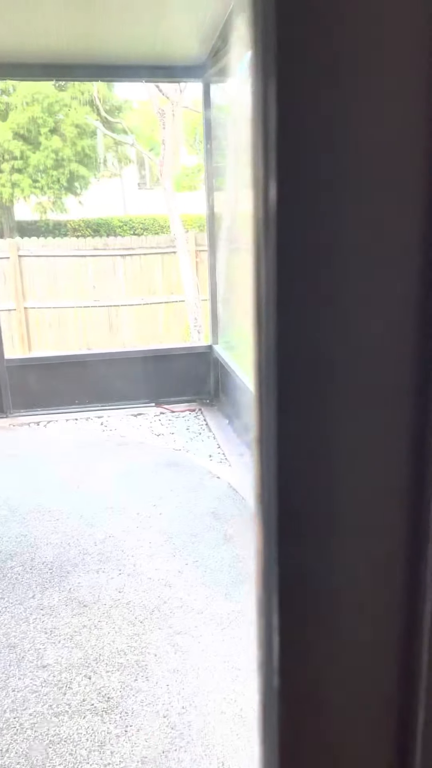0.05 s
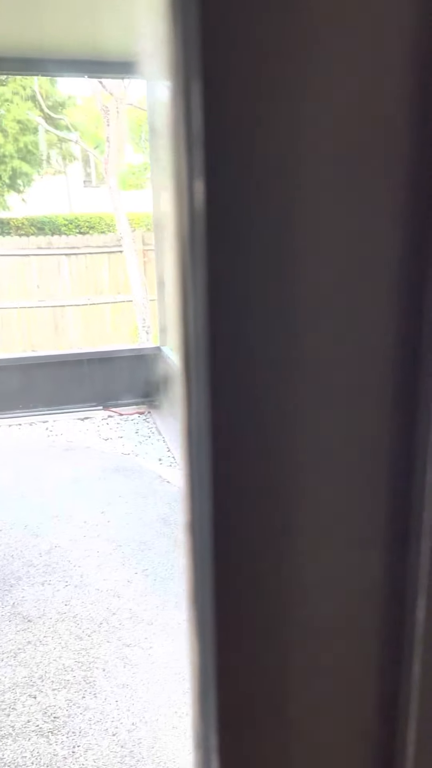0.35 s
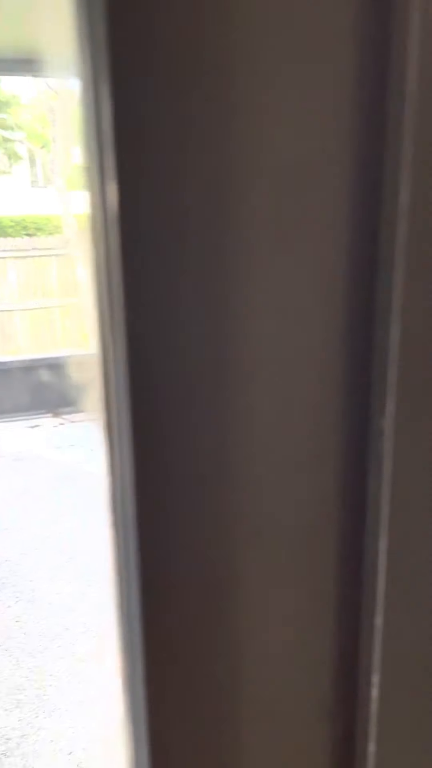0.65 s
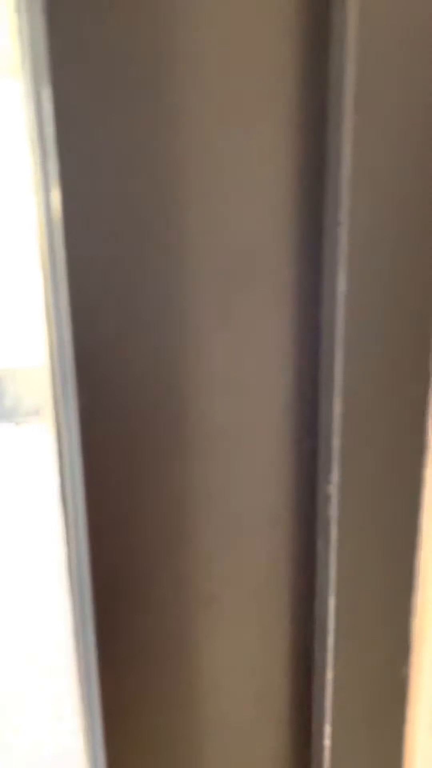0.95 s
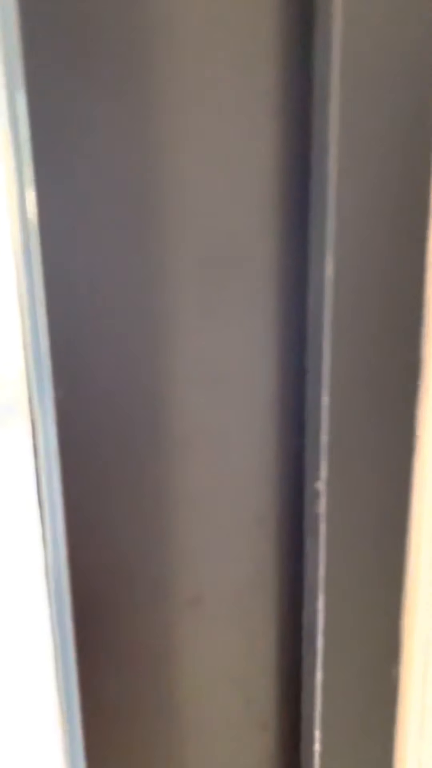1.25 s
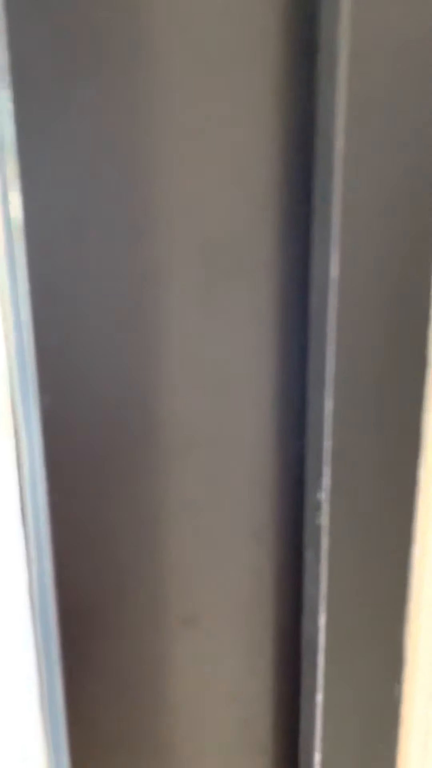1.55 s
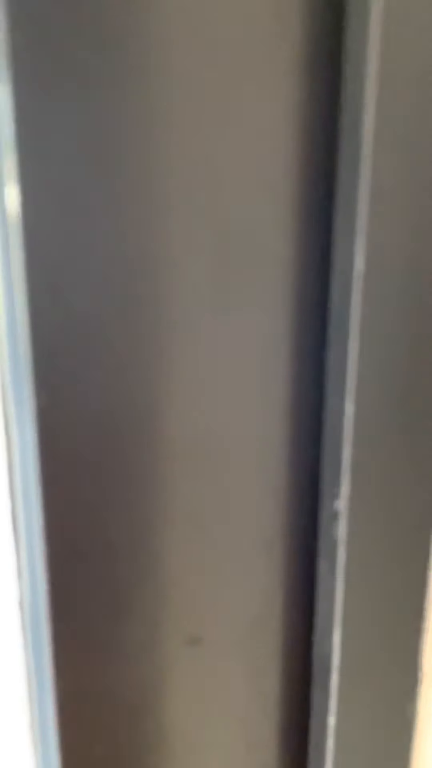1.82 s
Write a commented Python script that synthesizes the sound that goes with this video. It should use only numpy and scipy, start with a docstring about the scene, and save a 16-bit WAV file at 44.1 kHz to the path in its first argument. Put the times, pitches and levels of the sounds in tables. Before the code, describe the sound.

A sliding glass door unlatches, knocks free and rolls open along a gritty track, letting in an air conditioner's drone and insect hiss.

```python
"""Fingers click at the handle of a sliding glass door, close by in a quietly rumbling room. The latch
snaps, the sash drags out of its weatherstrip, and frame and pane knock as it comes free.
The wheels roll along a gritty track, jolting over dents, and coast to a stop. The widening gap lets in
the drone of an air conditioner and the hiss of insects from the patio."""
import sys
import numpy as np
from scipy import signal
from scipy.fft import rfft, irfft
from scipy.io import wavfile

SR = 44100
rng = np.random.default_rng(int(sys.argv[2]) if len(sys.argv) > 2 else 0)


def inscribe(sig):
    """Save sig as 16-bit PCM at rate SR to the path in sys.argv[1].

    A 1-D sig is mono; a 2-D sig holds one channel per row.
    Samples are clipped to [-1, 1] before scaling.
    """
    pcm = np.round(np.clip(np.atleast_2d(sig).T, -1, 1) * 32767)
    wavfile.write(sys.argv[1], SR, pcm.astype(np.int16))


N = 271215
T = np.arange(N) / SR

# Spectra of steady noise. Each row: frequency in Hz, relative level in dB.
INDOOR_SPECTRUM = [(20, -21), (45, -11.5), (70, 4), (140, 2.5), (200, -5.5), (350, -11), (700, -22),
                   (1500, -33), (3000, -42.5), (4000, -41), (6000, -79), (9000, -67), (16000, -64)]
FAN_SPECTRUM = [(15, -33), (25, -43), (48, 0.5), (92, 3), (113, -10.5), (139, -5.5), (151, -4), (186, -38),
                (221, -14.5), (349, -25.5), (391, -20.5), (595, -25.5), (763, -21), (978, -28.5),
                (2400, -38), (3120, -51), (5280, -120)]
INSECT_SPECTRUM = [(1500, -36), (2400, -9), (2900, -1), (3350, -3), (3900, 8.5), (4130, 5.5), (4280, 6),
                   (4480, 0), (5200, -1.5), (6200, -13.5), (7500, -46.5), (10500, -27), (14000, -55.5)]
# Spectra of friction and impact. Each row: frequency in Hz, relative level in dB.
SEAL_SPECTRUM = [(100, 0), (330, 9.5), (1000, 2), (2000, 6), (3500, 11.5), (6400, 7), (7500, -21.5),
                 (9500, 1.5), (12500, -10.5), (14000, -47), (16000, -36.5)]
ROLL_SPECTRUM = [(100, -8), (230, 7.5), (370, 6.5), (520, 7), (830, 2.5), (1300, -9.5), (1900, -4.5),
                 (3200, -12), (5000, -15.5), (6500, -15.5), (7500, -56), (9000, -21.5), (10500, -24),
                 (12500, -30), (14000, -58)]
RUMBLE_SPECTRUM = [(20, -32), (45, -3), (72, 11.5), (110, -1), (140, -2), (200, -10), (400, -64)]
GRAIN_SPECTRUM = [(800, -25), (3000, 8.5), (5800, 12.5), (7500, -10), (10000, 8.5), (12500, -8),
                  (14000, -22), (16000, -24)]
CLACK_SPECTRUM = [(100, -25), (500, 23.5), (1000, 9.5), (2000, 6.5), (3500, 7), (5300, 3), (7000, 0),
                  (12000, -46), (16000, -29)]
TICK_SPECTRUM = [(800, -32.5), (2700, 9), (5200, 4), (7500, -11.5), (10000, 9), (12500, 4), (16000, -19)]
# Spectra of room echo, sash ring and pane-edge echo. Each row: frequency in Hz, relative level in dB.
ROOM_SPECTRUM = [(200, -10), (800, 6), (2000, -1), (3000, 4), (5000, -1), (7000, -5.5), (12000, -6.5)]
RING_SPECTRUM = [(40, 10.5), (150, 2), (290, -1), (520, -4.5), (1000, -12), (2000, -1.5), (8000, -27.5)]
EDGE_SPECTRUM = [(150, -13), (400, 5), (900, -5.5), (1450, 5), (1800, -5), (8000, -30)]
# Stereo width. Each row: frequency in Hz, gain of the side signal in dB.
SIDE_GAIN = [(60, -51.5), (140, -36), (300, -14.5), (600, -5.5), (1000, -4.5), (1800, -10.5), (2750, -0.5),
             (3600, -3), (5600, -5.5), (6500, 4), (7500, 25), (9000, 3.5), (11000, -17), (14000, 12)]

# Resonances of the door's parts. Each row: frequency in Hz, width in Hz, lift in dB.
FRAME_MODES = [(136.7, 16, 10.5), (234, 55, 3.5), (352, 33, 3.5), (790, 2360, 4.5), (1303, 270, 5),
               (1850, 630, -3), (2300, 230, 2.5), (2637, 230, 5), (2936, 150, 3.5), (4120, 210, -6),
               (5140, 105, 2.5), (11540, 1200, 1.5)]  # pane and aluminium frame
JAMB_MODES = [(1450, 193, 2), (2280, 210, -5), (3860, 160, 4), (4220, 187, 7), (5163, 300, 1),
              (5760, 390, -6.5), (6150, 220, 2.5)]  # hollow jamb
WHEEL_MODES = [(1226, 53, 1.5), (1395, 68, 4.5), (1510, 75, -1.5), (2720, 95, 5), (3480, 140, -0.5)]  # roller housings
LOCK_MODES = [(1260, 1200, 13), (2174, 360, 8.5), (2690, 310, 2.5), (5350, 2200, 10)]  # handle and lock
HOOK_MODES = [(930, 83, 6), (1430, 304, 10), (2665, 200, 7.5), (3200, 490, -7), (3750, 150, 4),
              (4200, 100, 6.5), (4410, 100, 5), (4925, 110, 4.5), (6250, 300, 5), (10730, 90, 5),
              (11570, 300, 10.5)]  # steel latch hook

# Compressor hum. Each row: multiple of the shaft rate, relative level in dB.
HUM_HARMONICS = [(2, -55.5), (3, -58.5), (5, -46.5), (8, -56.5), (9, -72), (13, -76.5), (14, -66),
                 (15, -64), (16, -70), (18, -67), (27, -70), (28, -71)]
# Drag of the sash out of the weatherstrip. Each row: time in seconds, relative level in dB.
DRAG_LEVELS = [(1.415, -42.5), (1.47, -43), (1.54, -42), (1.64, -37.5), (1.77, -41), (2.0, -55), (2.3, -55),
               (2.6, -90), (3.2, -100)]
# Rolling follows speed: a tug, then a long push. Each row: time in seconds, relative level in dB.
ROLLING_LEVELS = [(1.8, -38.5), (2.08, -34.5), (2.42, -43), (2.68, -34), (3.1, -35.5), (3.3, -34),
                  (3.72, -38), (4.05, -40.5), (4.25, -64)]
# A faint distant chirp, probably a bird, then brief metal squeaks from the track.
# Each row: start in seconds, relative level in dB, pitch in Hz, length in seconds.
CHIRP_AND_SQUEAKS = [(0.73, -67.5, 4880, 0.11), (2.032, -42.5, 5440, 0.027), (2.213, -35.5, 6160, 0.0062),
                     (2.888, -45, 5270, 0.013), (2.943, -37.5, 5040, 0.013), (2.965, -38, 5100, 0.0061),
                     (2.987, -42, 5300, 0.012)]
# Groans of a binding wheel. Each row: start in seconds, level in dB, pitch in Hz, width in octaves.
WHEEL_GROANS = [(1.948, -34, 696, 0.34), (2.015, -36, 700, 0.35), (2.105, -36, 334, 0.5),
                (2.995, -34, 403, 0.25), (3.188, -33, 526, 0.19), (3.28, -43, 294, 0.63)]
# Grains cracking under the rollers. Each row: start in seconds, relative level in dB, decay in ms.
SAND_CRACKS = [(2.214, -31.5, 3.5), (2.679, -43, 6), (2.737, -41, 3.4), (2.801, -40, 4.7),
               (2.947, -45, 4.4), (3.18, -34.5, 5.9), (3.204, -39, 4), (3.24, -37.5, 4.3),
               (3.4147, -37.5, 4.3), (3.523, -46, 5), (3.766, -47, 3), (3.779, -43, 5.6), (3.815, -43, 3.5)]
# Jolts over the deeper dents. Each row: start in seconds, relative level in dB, pitch in Hz,
# width in octaves, decay in ms.
DEEP_DENTS = [(1.950, -28.5, 2000, 2.2, 4), (2.068, -28, 2640, 1.6, 6.3), (2.095, -40, 2500, 1.4, 3.7),
              (2.118, -34.5, 2000, 1.7, 7.6), (2.135, -30.5, 2740, 1.5, 17), (2.155, -30, 2460, 1.6, 20),
              (2.175, -33, 2470, 1.6, 8.1), (2.188, -24.5, 1350, 0.5, 2.9), (2.224, -28, 3080, 1.3, 8.1),
              (2.259, -29.5, 1570, 1.33, 7.6), (2.311, -25.5, 1920, 1.74, 6.8), (2.337, -41, 1300, 0.65, 6),
              (2.414, -29.5, 1750, 1.5, 4.5), (2.469, -28, 2400, 1.7, 4.3), (2.547, -19, 1940, 2.5, 8),
              (2.563, -36, 2400, 1.1, 7), (2.589, -42, 1600, 1.4, 4.1), (2.611, -32.5, 2000, 2.4, 8.3),
              (2.657, -21, 2320, 1.24, 4.8), (2.675, -32, 3400, 1.1, 7), (2.6973, -19, 1670, 0.94, 2.5),
              (2.735, -32.5, 1990, 2.7, 4.5), (2.786, -33, 2300, 2.1, 5.7), (2.835, -36, 2600, 1.6, 4.6),
              (2.862, -33.5, 1400, 2.3, 3.9), (2.9064, -26.5, 1630, 2, 5.2),
              (3.0366, -22.5, 1340, 1.27, 2.7), (3.068, -41, 1500, 1.2, 3), (3.177, -23.5, 2070, 2.3, 6.3),
              (3.203, -32, 2680, 1.4, 7), (3.239, -28.5, 1940, 1.7, 6.3), (3.290, -34.5, 1600, 1.9, 21),
              (3.322, -34, 1700, 2.5, 6.4), (3.390, -35, 1340, 1.4, 4.9), (3.534, -21.5, 2210, 2.15, 5.3),
              (3.548, -32.5, 2280, 0.99, 9.9), (3.579, -36, 2290, 1.3, 20), (3.740, -38.5, 1380, 1.7, 9.6),
              (4.037, -40.5, 860, 1.3, 6.9)]
# Clicks of the handle, then two sharp knocks of the frame as the sash comes free. Each row: start in
# seconds, relative level in dB, pitch in Hz, width in octaves, tick offset in dB, decay in ms.
HANDLE_AND_FRAME_CONTACTS = [(.0635, -25.5, 3800, 1.14, -18, 4.7), (.0648, -26.5, 1400, 0.85, -15, 2.3),
                             (.287, -51, 1270, 1.2, -18, 4.5), (.301, -41, 1320, 1.4, -11, 2.4),
                             (.311, -48.5, 1710, 1.2, 1, 7.3), (.330, -46, 1330, 0.79, -10, 10),
                             (.361, -51, 1200, 1.5, -9, 4), (.428, -52.5, 4000, 1.2, -10, 6),
                             (.549, -43, 940, 1.6, -18, 7.5), (.5618, -18, 1793, .9, -21, 1.76),
                             (.5675, -36.5, 1710, 2.8, -22, 3.4), (.597, -36.5, 1050, 2.7, -19, 3.6),
                             (.6595, -43.5, 950, 0.99, -18, 4), (1.032, -49.5, 1200, 1.7, -1, 3.2),
                             (1.074, -57.5, 4920, 1.1, 5, 41), (1.171, -39.5, 2140, 1.34, -6.5, 8.9),
                             (1.34, -48.5, 2080, 0.63, 4.5, 5.7), (1.611, -23, 1970, 1.25, -3, 10),
                             (1.7933, -29.5, 2180, 1.1, 12.5, 3.7)]
# The double crack of the latch, with the same columns.
LATCH_CONTACTS = [(1.394, -36, 2100, 1.6, -29, 6.7), (1.3985, -32, 2300, 3.4, -11.5, 4.3),
                  (1.4021, -23.5, 4200, 4.3, 15.5, 1.1), (1.4035, -21.5, 2654, 4.3, -4, 9.2),
                  (1.4085, -27, 3000, 2.6, -9, 13), (1.4144, -13.5, 3000, 3.4, 4.5, 2.3),
                  (1.4175, -17.5, 3010, 3.8, 1.5, 3.5)]
# Blows that flex the pane. Each row: start in seconds, peak in dB, centre in Hz,
# dispersive delay at 1 kHz in ms, ring relative to the blow in dB.
PANE_KNOCKS = [(.069, -33, 136, 1.03, -12.5), (.355, -38.5, 155, 1.13, -10), (.569, -29.5, 119, 1.18, -8),
               (0.5968, -22, 200, 1.06, -10.5), (.660, -32, 227, 1.03, -9.5), (1.091, -30.5, 165, 1.08, -8),
               (1.18, -32.5, 104, 0.99, -11), (1.413, -13.5, 104.6, 1.9, -33),
               (1.612, -28.5, 340, 0.85, 2.5), (1.792, -0.4, 408, 2.5, -20.5),
               (1.909, -18, 106, 0.8, -15.5), (1.955, -24, 132, 1.1, -12.5), (1.985, -26.5, 190, 0.93, -9),
               (2.155, -25.5, 130, 1.01, -10.5)]

def amp(db):
    """Decibels are logarithmic: 20 dB is a factor of ten in amplitude."""
    return 10 ** (np.asarray(db) / 20)

def unit(x):
    """Normalisation: the first row (mid) gets an rms of 1."""
    return x / np.std(x[0])

def noise(size=N):
    """Uncorrelated white noise for mid and side."""
    return rng.standard_normal((2, size))

def curve(rows):
    """Linear interpolation between (seconds, value) rows."""
    return np.interp(T, *np.transpose(rows))

def onset(start, rise_s):
    """A linear ramp from 0 to 1."""
    return np.clip((T - start) / rise_s, 0, 1)

def walk(rate_hz):
    """Random modulation with a spread near 1."""
    steps = rng.standard_normal(4096)
    return 1.2 * np.interp(T * rate_hz, np.arange(len(steps)), steps)

def add(out, start, x):
    """Superposition: a sound joins the mix at its start in seconds."""
    i = int(start * SR)
    out[:, i:i + x.shape[1]] += x[:, :N - i]

def band(x, centre_hz, octaves, order):
    """Band-pass filtering, symmetric in octaves about a centre."""
    edges = np.clip(centre_hz * 2. ** (np.array([-.5, .5]) * octaves), 10, .45 * SR)
    return signal.sosfilt(signal.butter(order, edges, "band", fs=SR, output="sos"), x)

def convolve(x, impulse):
    """Convolution: every sample excites the whole impulse response."""
    return signal.oaconvolve(x, impulse, axes=1)[:, :N]

def response(spectrum, modes=(), size=4096):
    """Minimum-phase impulse response of a spectrum lifted by resonances."""
    hz = np.maximum(np.arange(size // 2 + 1) * SR / size, 1)
    at_hz, at_db = np.transpose(spectrum)
    db = np.interp(np.log(hz), np.log(at_hz), at_db)
    for centre, width, lift in modes:
        db += lift / (1 + (2 * (hz - centre) / width) ** 2)
    cepstrum = irfft(np.log(amp(db)))
    cepstrum[1:size // 2] *= 2  # folding makes the response causal
    cepstrum[size // 2 + 1:] = 0
    return irfft(np.exp(rfft(cepstrum)))

def colour(x, spectrum, modes=()):
    """Spectral shaping at unit energy: white noise keeps its power."""
    impulse = response(spectrum, modes)
    return convolve(x, impulse[None] / np.linalg.norm(impulse))

def tail(t60, spectrum, modes=()):
    """Reverberation: dense modes merge into noise that falls 60 dB in t60 seconds."""
    t = T[:SR]
    ring = colour(noise(SR), spectrum, modes)[:, :SR]
    ring *= amp(-60 * t / t60) * (1 - np.exp(-t / .004))
    return ring / np.linalg.norm(ring[0])

def indoors():
    """Ambient noise: the room rumbles at a slowly wavering level."""
    return unit(colour(noise(), INDOOR_SPECTRUM)) * amp(-47 + 1.33 * walk(3.55))

def insects(level_db):
    """Incoherent sources: a far chorus blurs into hiss, higher callers left, lower ones right."""
    shimmer_db = .2 * walk(3) + .6 * walk(18) + .5 * walk(70)
    mid, side = unit(colour(noise(), INSECT_SPECTRUM)) * amp(level_db + shimmer_db)
    high_callers = band(mid, 3740, .72, order=1)
    low_callers = band(mid, 2710, .3, order=1)
    return np.array([mid, 1.1 * side + .87 * high_callers - .4 * low_callers])

def air_conditioner(fan_db, hum_db, shaft_hz):
    """Rotating machinery: broadband fan noise carries wavering harmonics of the compressor shaft."""
    out = unit(colour(noise(), FAN_SPECTRUM)) * amp(fan_db + .87 * walk(13))
    shaft_angle = 2 * np.pi * np.cumsum(shaft_hz * (1 + .003 * walk(5))) / SR
    for order, db in HUM_HARMONICS:
        peak = np.sqrt(2) * amp(db + hum_db + 1.8 * walk(4))
        out[0] += peak * np.sin(round(order) * shaft_angle + rng.uniform(0, 2 * np.pi))
    return out

def gap(leak_db, parts_s, opening_s):
    """Transmission through an aperture: power grows with its width, on top of a constant leak."""
    return np.sqrt(amp(leak_db) ** 2 + onset(parts_s, opening_s))

def chirp_and_squeaks(gain_db):
    """Narrow resonance: a faint distant chirp, probably a bird, then metal squeaks from the track."""
    out = np.zeros((2, N))
    for start, db, pitch_hz, length_s in CHIRP_AND_SQUEAKS:
        size = int(length_s * SR)
        tone = unit(band(noise(size), pitch_hz, octaves=.11, order=2))
        add(out, start, amp(db + gain_db) * tone * np.hanning(size))
    return out

def bending_modes(force, share):
    """Forced vibration: the many close modes of the sash colour rubbing and rolling."""
    return force + share * convolve(force, tail(t60=.13, spectrum=[(100, 0), (16000, 0)]))

def weatherstrip(pull_s, release_s, creep_db):
    """Friction: the brush seal creeps until the latch lets go, then hisses along the hollow jamb."""
    free = onset(release_s, rise_s=.006)
    creep = amp(creep_db) * onset(pull_s, rise_s=.0077) * (1 - free)
    drag = amp(curve(DRAG_LEVELS)) * free
    hiss = colour(bending_modes(noise(), share=.935), SEAL_SPECTRUM, FRAME_MODES + JAMB_MODES)
    return unit(hiss) * (creep + drag) * amp(1.4 * walk(90))

def groans(rise_s, side_share):
    """Resonance: a binding wheel excites one low mode of the sash, which swells and fades."""
    out = np.zeros((2, N))
    age = T[:SR // 2] / rise_s
    swell = age * np.exp(1 - age)
    for start, db, pitch_hz, octaves in WHEEL_GROANS:
        judder = band(noise(SR), pitch_hz, octaves, order=2)[:, -len(age):]
        add(out, start, amp(db) * unit(judder * swell) * np.std(swell))
    return out * [[1], [side_share]]

def chatter(decay_ms, damping=1, size=4096):
    """Hard contact: a burst of tiny impacts dies away, more abruptly with damping above 1."""
    age = 1000 * T[:size] / decay_ms
    attack = 1 - np.exp(-age / .029)
    return 1.145 * noise(size) * attack * np.exp(-age ** damping)

def sand(gain_db):
    """Brittle fracture: single grains are crushed with a thin scrape."""
    out = np.zeros((2, N))
    for start, db, decay_ms in SAND_CRACKS:
        add(out, start, amp(db + gain_db) * chatter(decay_ms))
    return colour(out, GRAIN_SPECTRUM, FRAME_MODES)

def clicks(contacts, modes, clack_db, treble_db, damping):
    """Impact excitation: each contact clacks and rings the part it strikes; sharp ones add a tick."""
    clacks, ticks = np.zeros((2, 2, N))
    for start, db, pitch_hz, octaves, tick_db, decay_ms in contacts:
        burst = chatter(decay_ms, damping)
        clack = band(burst, pitch_hz, octaves, order=3)
        add(clacks, start, amp(db) * unit(clack) * np.std(burst[0]))
        add(ticks, start, amp(db + tick_db) * chatter(decay_ms, damping))
    body = amp(clack_db) * colour(clacks, CLACK_SPECTRUM, modes)
    return body + amp(treble_db) * colour(ticks, TICK_SPECTRUM, modes)

def rolling_db(coast_db_per_s=85.5):
    """Rolling noise follows speed, then decays exponentially after the last push."""
    return curve(ROLLING_LEVELS) - coast_db_per_s * np.maximum(T - ROLLING_LEVELS[-1][0], 0)

def jolts(dents_per_s, bounce_s, bounce_db, tick_db):
    """Impact and rebound: wheels hit deep dents and small random ones, the latter harder at speed."""
    first, last = ROLLING_LEVELS[0][0], ROLLING_LEVELS[-1][0]
    count = int(dents_per_s * (last - first))
    jitter, strength, pitch, length = rng.standard_normal((count, 4)).T
    times = first + (np.arange(count) + 1 + .93 * jitter) / dents_per_s
    levels = np.interp(times, T, rolling_db()) - 12.5 + .5 * strength
    pitches_hz = 2010 * 2 ** (.5 * pitch)
    widths_octaves = np.full(count, 1.9)
    decays_ms = 2.7 * 2 ** (.5 * length)
    small_dents = list(zip(times, levels, pitches_hz, widths_octaves, decays_ms))
    contacts = []
    for start, db, pitch_hz, octaves, decay_ms in DEEP_DENTS + small_dents:
        contacts.append((start, db, pitch_hz, octaves, tick_db, decay_ms))
        contacts.append((start + bounce_s, db + bounce_db, pitch_hz, octaves, tick_db, decay_ms))
    # the weight of the door chokes each jolt
    return clicks(contacts, FRAME_MODES + WHEEL_MODES, clack_db=-9, treble_db=-4, damping=1.6)

def rollers(grit_db, rumble_db, drop_s):
    """Roughness excitation: the track drives gritty noise in the frame and a rumble in the glass."""
    rolling = amp(rolling_db()) * onset(ROLLING_LEVELS[0][0], rise_s=.04)
    # the pane shudders as it drops onto its rollers
    shudder_db = -30.5 - 31.5 * np.maximum(T - drop_s, 0)
    shudder = amp(shudder_db) * onset(drop_s, rise_s=.016)
    roughness_db = 2.5 * walk(400) + 1.5 * walk(45)
    vibration = bending_modes(noise() * amp(roughness_db), share=.39)
    grit = unit(colour(vibration, ROLL_SPECTRUM, FRAME_MODES))
    rumble = unit(colour(noise(), RUMBLE_SPECTRUM, FRAME_MODES))
    return grit * rolling * amp(grit_db) + rumble * (rolling * amp(rumble_db) + shudder)

def pane(ring_t60, edge_t60, edge_db, side_share, size=8192):
    """Dispersion: high bending waves run faster, so a knock is a falling chirp that echoes and rings."""
    hz = np.arange(size // 2 + 1) * SR / size
    direct, ring_drive = np.zeros((2, 1, N))
    for start, db, centre_hz, delay_ms, ring_db in PANE_KNOCKS:
        phase_lag = 4 * np.pi * delay_ms * np.sqrt(hz / 1000)
        chirp = irfft(np.exp(-1j * phase_lag))[None, :size // 2]
        wave = band(chirp, centre_hz, octaves=2.55, order=4)
        wave *= amp(db) / np.abs(wave).max()
        add(direct, start, wave)
        add(ring_drive, start, wave * amp(ring_db))
    edge_echoes = amp(edge_db) * convolve(direct, tail(edge_t60, EDGE_SPECTRUM))
    ring = convolve(ring_drive, tail(ring_t60, RING_SPECTRUM, FRAME_MODES))
    return (direct + edge_echoes) * [[1], [side_share]] + ring

def scene():
    """Superposition: door, room and patio add as mid and side, then become left and right."""
    handle_and_frame = clicks(HANDLE_AND_FRAME_CONTACTS, LOCK_MODES,
                              clack_db=-11.5, treble_db=-6.5, damping=1.05)
    latch = clicks(LATCH_CONTACTS, HOOK_MODES, clack_db=-4.5, treble_db=-2, damping=1.15)
    track = jolts(dents_per_s=26, bounce_s=.004, bounce_db=-4.5, tick_db=-30)
    track += sand(gain_db=-2.5) + chirp_and_squeaks(gain_db=-5)
    # the latch is right beside the listener, so its direct sound far outweighs its echo
    room_drive = amp(-16.5) * handle_and_frame + amp(-28) * latch + amp(-12.5) * track
    room = convolve(room_drive[:1], tail(t60=.748, spectrum=ROOM_SPECTRUM))
    wheels = track + rollers(grit_db=-4, rumble_db=-7, drop_s=1.91)
    wheels += groans(rise_s=.011, side_share=.4)
    sash = pane(ring_t60=.46, edge_t60=.14, edge_db=-20, side_share=.21)
    sash += weatherstrip(pull_s=1, release_s=1.412, creep_db=-76.5)
    background = indoors()
    patio = air_conditioner(fan_db=-43.5, hum_db=-2, shaft_hz=27.56) + insects(level_db=-53.5)
    background += patio * gap(leak_db=-24, parts_s=1.41, opening_s=.98)
    mid, side = background + room + handle_and_frame + latch + wheels + sash
    # the wheels and, less so, the sash lean left; the ring of the hook leans right
    lean_left = .32 * band(wheels[0], 910, 2.7, order=1) + .07 * band(sash[0], 912, 2.77, order=1)
    lean_right = .45 * band(latch[0], 2660, .34, order=1)
    side = signal.oaconvolve(side, response(SIDE_GAIN))[:N] + lean_left - lean_right
    return np.array([mid + side, mid - side])

def record(dry):
    """Soft saturation rounds the loudest peaks; a steep low-pass removes the highest treble."""
    low_pass = signal.ellip(8, .2, 70, 16200, fs=SR, output="sos")
    return signal.sosfilt(low_pass, np.tanh(dry))

dry = scene()
out = record(dry)
inscribe(out)
```